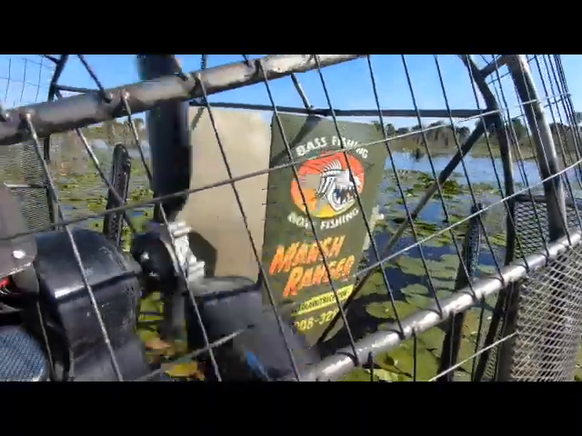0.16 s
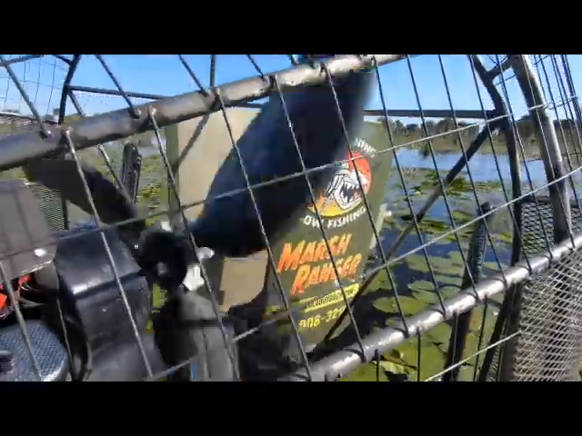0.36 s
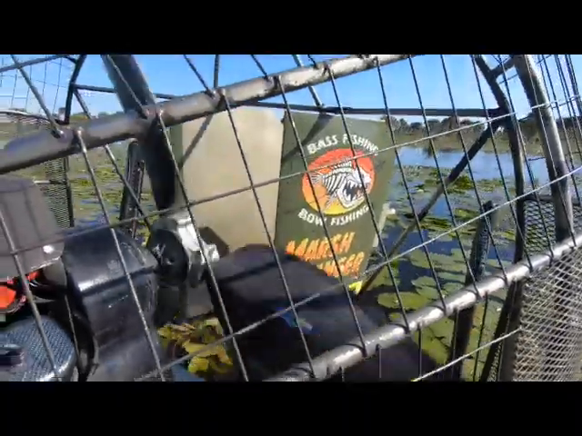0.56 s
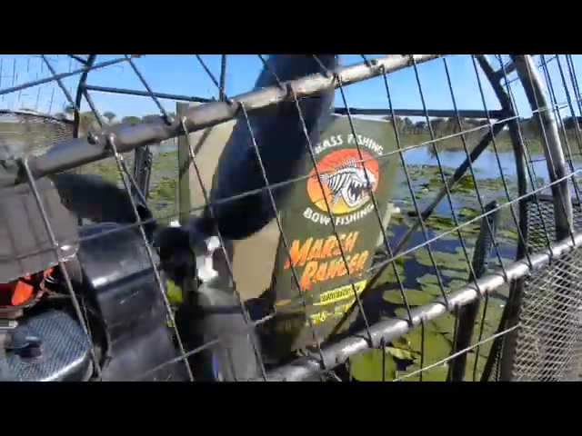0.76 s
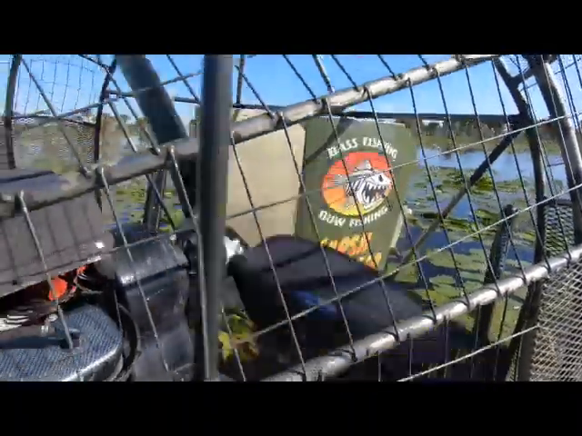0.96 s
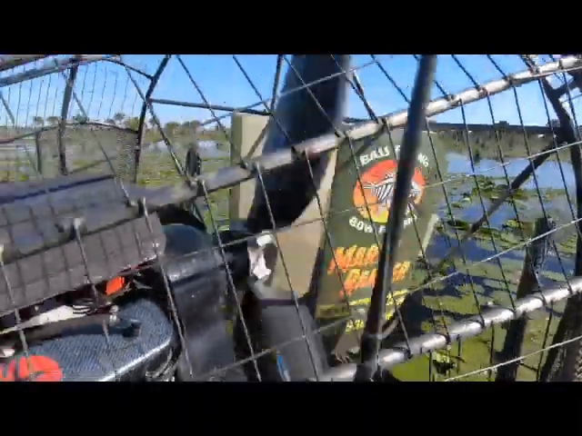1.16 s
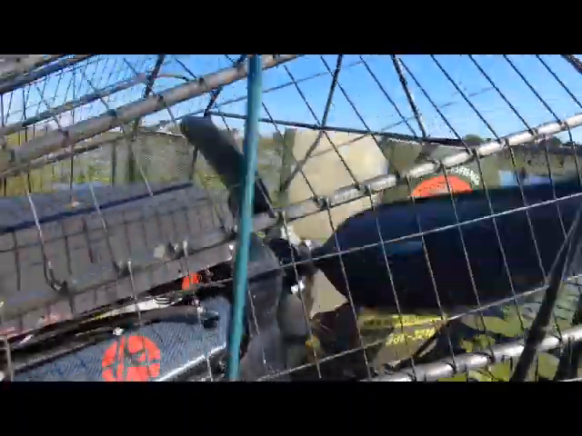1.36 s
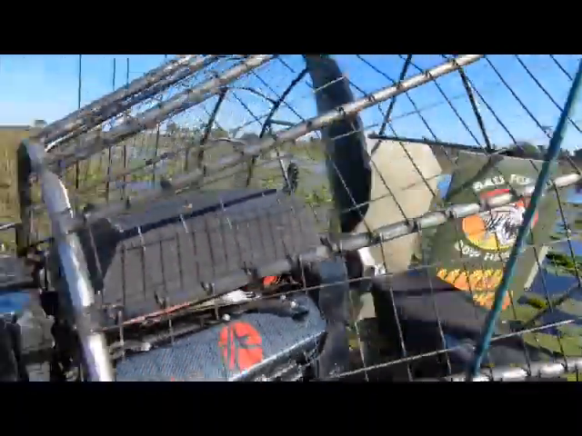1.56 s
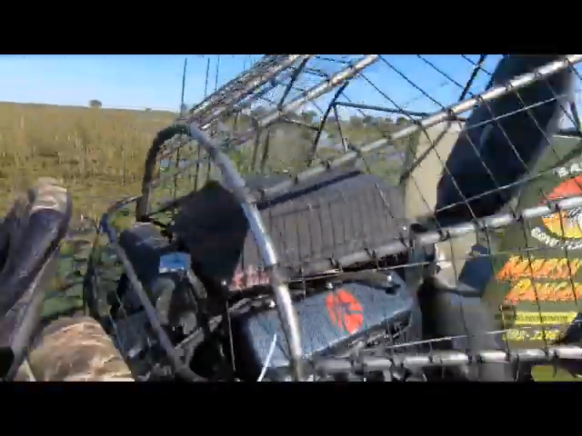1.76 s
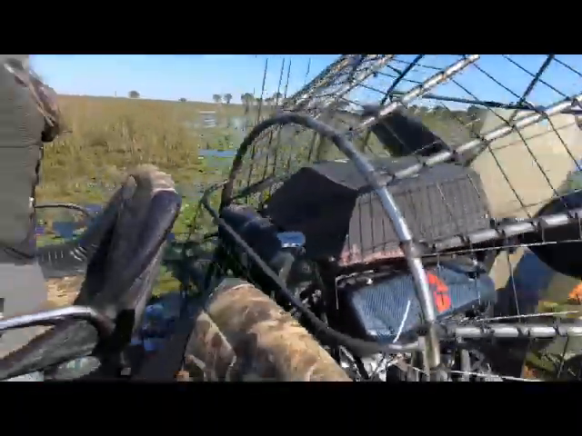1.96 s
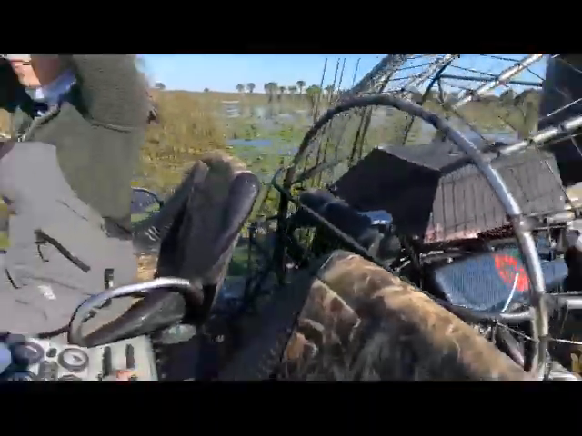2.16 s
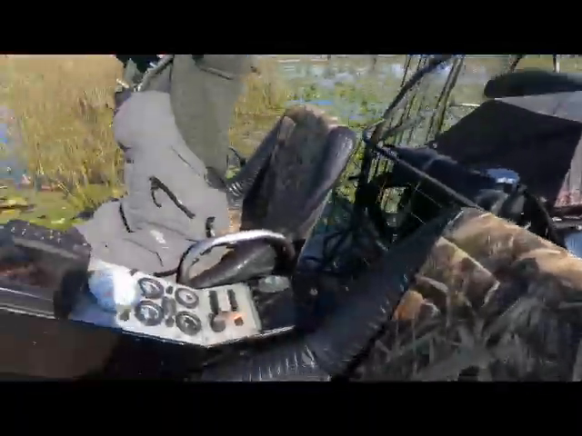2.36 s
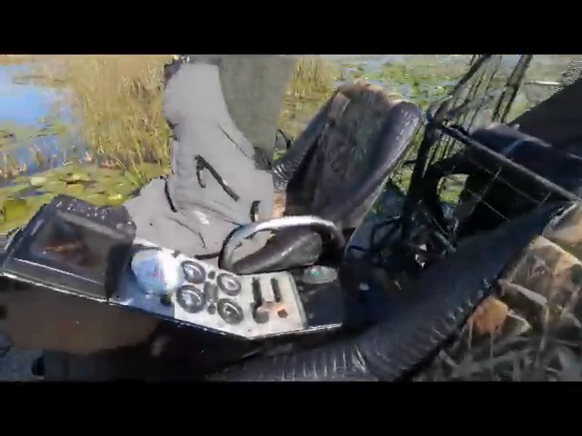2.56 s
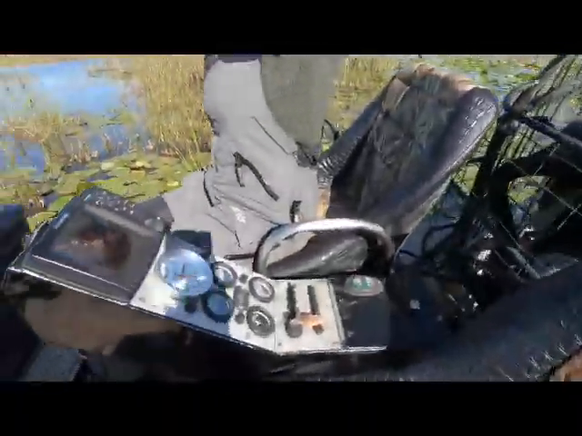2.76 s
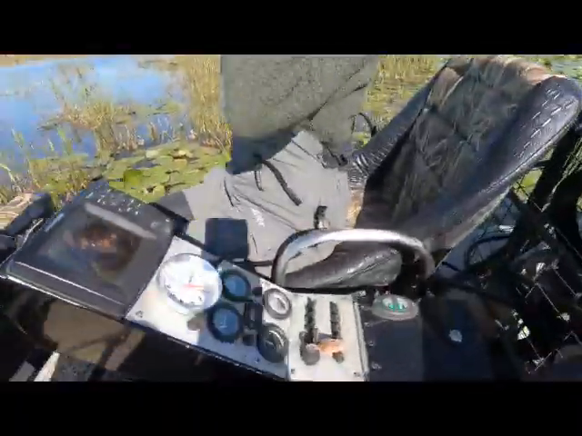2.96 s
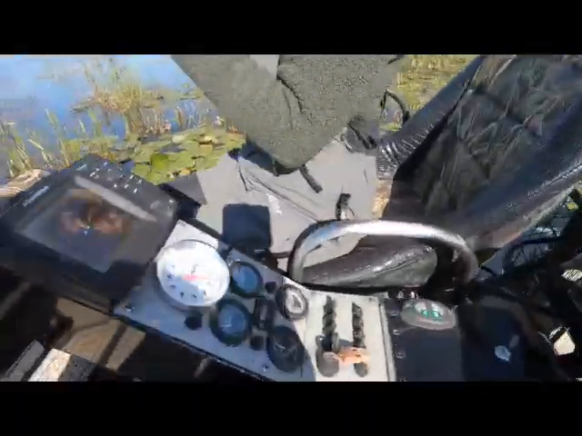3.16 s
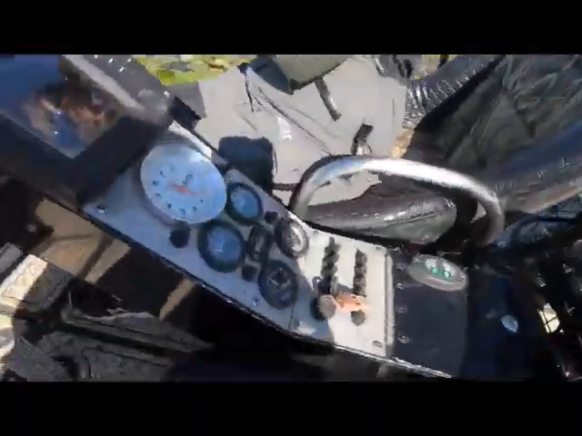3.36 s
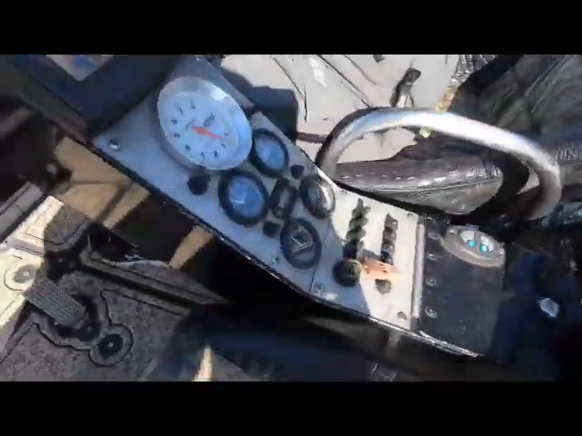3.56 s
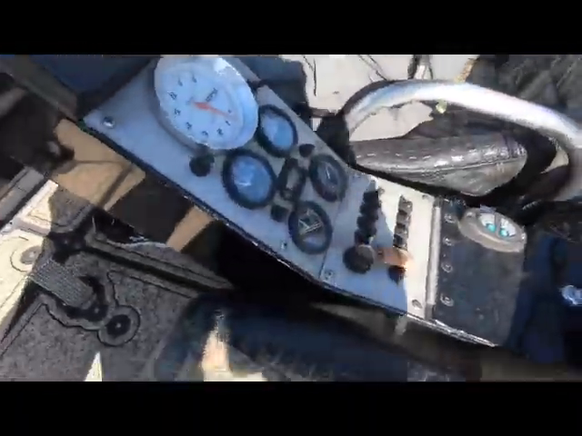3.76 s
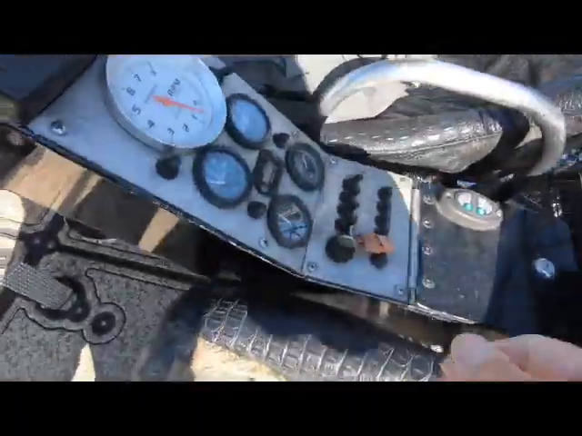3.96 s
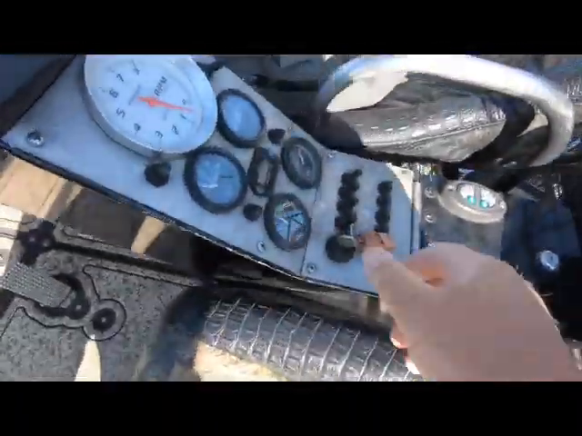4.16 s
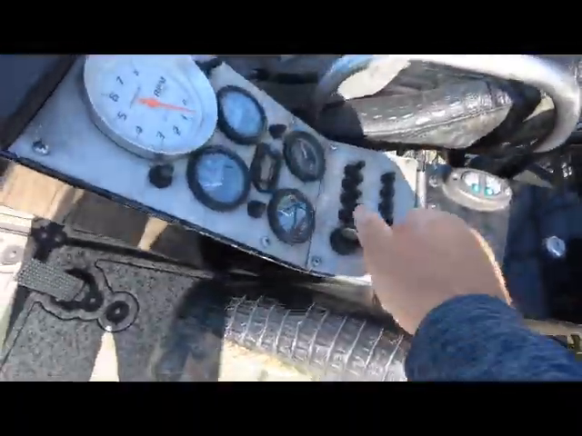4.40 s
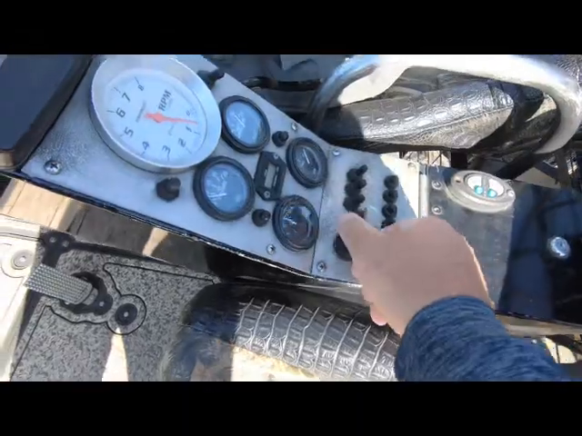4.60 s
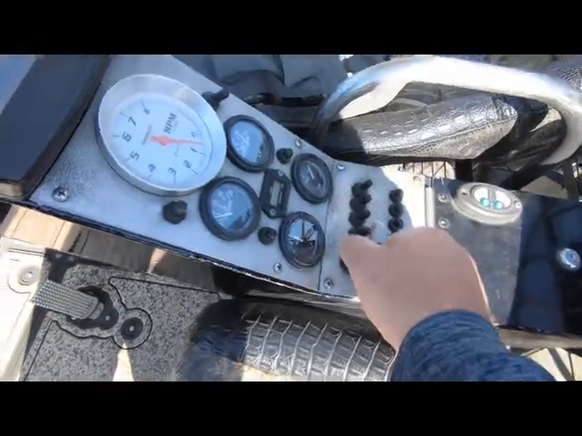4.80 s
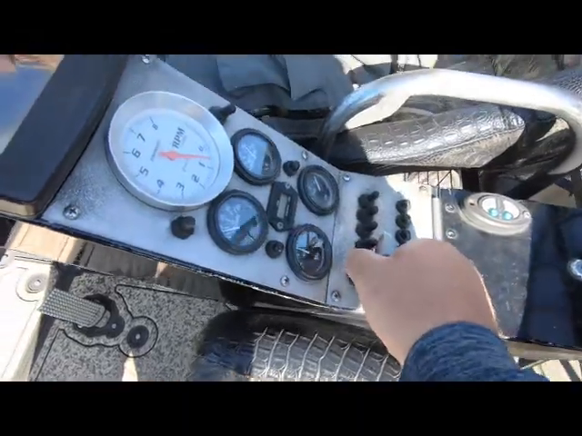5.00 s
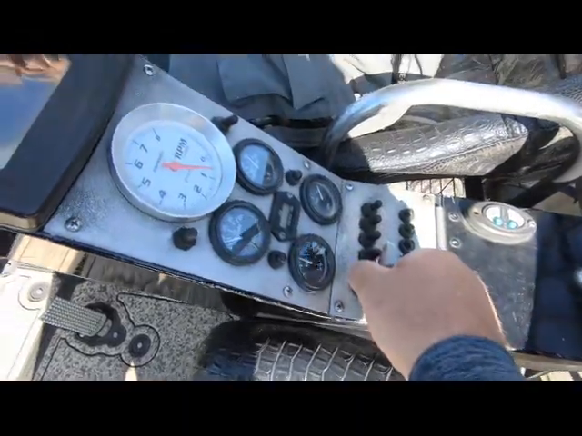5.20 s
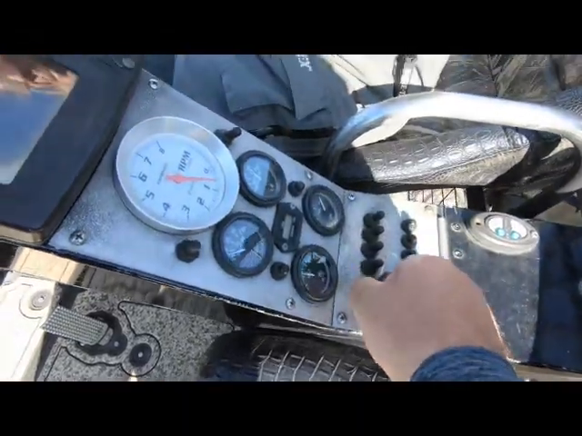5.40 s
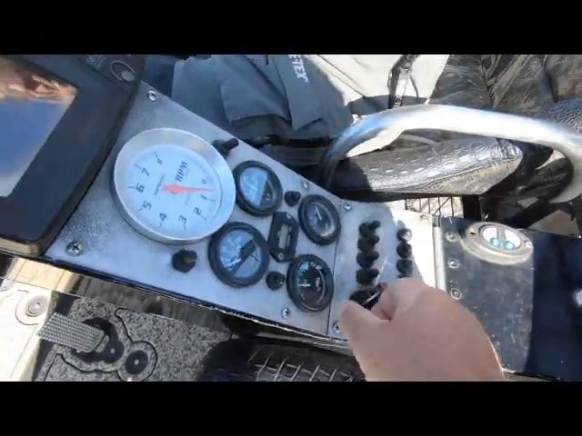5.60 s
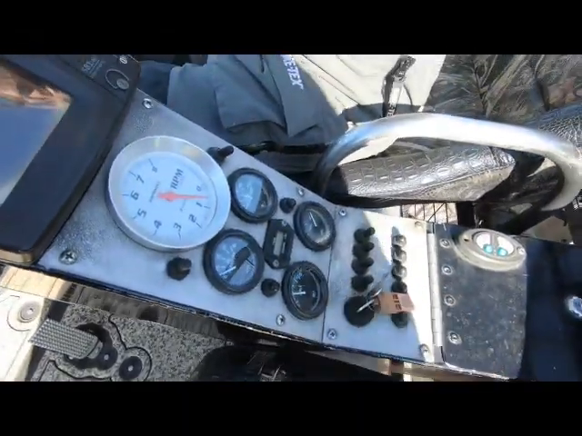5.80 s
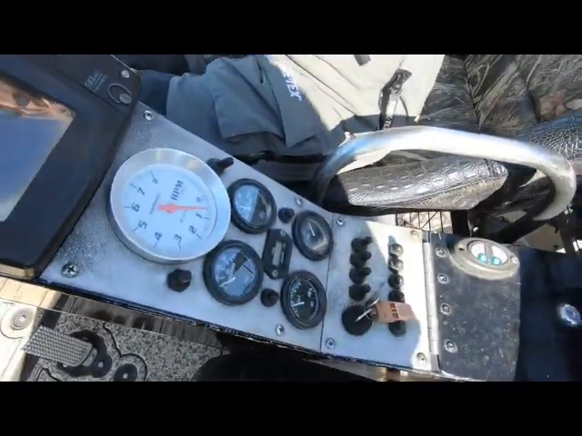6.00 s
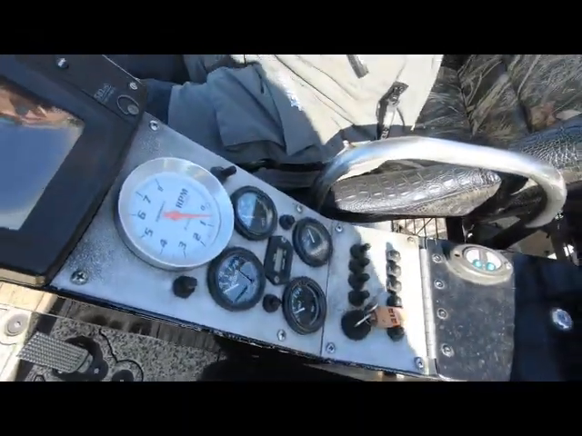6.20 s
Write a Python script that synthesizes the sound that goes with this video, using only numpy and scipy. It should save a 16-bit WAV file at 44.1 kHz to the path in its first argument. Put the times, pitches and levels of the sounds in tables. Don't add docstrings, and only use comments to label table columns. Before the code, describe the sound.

Outdoors on an open marsh, a large V8 with open pipes idles close to the microphone. Deep, uneven thumps pulse quickly, swelling as propeller blades pass, with metallic growl, thin gas hiss and small breathy spits. As the handheld microphone turns away, growl dulls while the bass stays. Near the end the engine is cut, drops, surges weakly and sinks into soft pumped air.

```python
import sys
import numpy as np
from scipy import signal
from scipy.fft import rfft, irfft, next_fast_len
from scipy.io import wavfile
from scipy.ndimage import uniform_filter1d

SR = 44100
rng = np.random.default_rng(int(sys.argv[2]) if len(sys.argv) > 2 else 0)


def voltage_ratio(decibels):
    exponent = np.asarray(decibels, float) / 20
    return 10 ** exponent


def unload_wav(signal):
    wavfile.write(
        sys.argv[1],
        SR,
        np.round(np.clip(np.atleast_2d(signal).T, -1, 1) * 32767).astype(np.int16),
    )


N = 275426
TIME = np.arange(N) / SR

# start_s, firings_per_s
IDLE_SPEED = [(0, 37.08), (.98, 37.64), (1.6, 34.7), (2.3, 37.66), (2.65, 36.08), (2.9, 37.05),
              (3.45, 34.1), (4.15, 35.56), (4.6, 37.2), (4.95, 35.35), (5.55, 36.68), (6.25, 21)]
FIRING_BANK = np.array([1, -1, -1, 1, -1, 1, 1, -1])
# start_s, near_bank_lead_firings, near_bank_louder_db, body_shade_db
CAMERA_PATH = [
    (0, .14, 2.5, -0.5),
    (1.05, .14, 2, 0),
    (1.7, .14, 4, -2.5),
    (2.3, .095, 1.3, -6),
    (2.7, .06, .8, -7.5),
    (3.8, .035, .9, -10.5),
    (4.3, .035, 1, -6.5),
    (5.3, .03, 1, -4.5),
    (6.25, .06, 2, -4),
]
# start_s, level_db
EFFORT_LEFT = [
    (5.39, 0),
    (5.47, -2.5),
    (5.6, -7),
    (5.72, -3.5),
    (5.82, -11),
    (5.97, -8),
    (6.06, -12.5),
    (6.12, -17.5),
    (6.25, -17.5),
]
# pitch_hz, t60_s, level_db
DEEP_MODES = [(71, .07, 0), (52, .08, -9), (100, .08, -9)]
BARK_MODES = [(123.1, 0.07, -3), (156.1, 0.085, -3), (217.4, 0.082, -10.5)]
# pitch_hz, density_db_per_hz
RUMBLE_COLOUR = [(22, -27.5), (30, -14.5), (40, -1), (60, -6.5), (76, -4), (90, -6), (125, -2), (160, -7),
                 (180, -23), (225, -14.5), (260, -31.5), (300, -25)]
# pitch_hz, width_hz, level_re_thump_db
COAST_MODES = [(55.1, 19.6, 3), (89.9, 11, -8), (152.8, 24.5, -4.5), (194.8, 21, -10.5)]
# pitch_hz, density_db_per_hz
GROWL_COLOUR = [(130, -20), (220, 0), (264, -5.5), (339, -5.5), (393, -3), (431, -10), (484, -9),
                (777, -17), (880, -15.5), (1280, -24.5), (1600, -29.5), (2080, -50.5), (3520, -120)]
# pitch_hz, width_hz, level_re_growl_db, coasting_gain_db
HUM_PANELS = [(381.6, 39, -12.5, -6.5), (432.6, 6.4, -14, 6), (455, 63, -15, -5), (677, 3.3, -25, 15.5),
              (917, 2.6, -31.5, 16)]
# pitch_hz, density_db_per_hz
HISS_COLOUR = [(650, -24), (1100, 3), (1330, -13), (1630, 0.5), (2060, 3), (2270, -2.5), (3240, -7),
               (4450, -2.5), (5340, -1), (6170, -15), (8560, -16), (9070, -19.5), (9800, -55), (11000, -49),
               (14300, -73), (22000, -120)]
FIZZ_COLOUR = [(6180, -38), (10500, -30), (11300, -22.5), (12100, 3), (12600, -3), (14500, -6), (15200, -3)]
# start_s, peak_db, whistle_hz, broad_hiss_re_peak_db
LATE_BURNS = [(0.0044, -36, 7100, -1), (0.165, -43, 7060, 4), (0.4642, -41.5, 6800, 3.5),
              (0.599, -33, 7670, 0), (0.7295, -44.5, 6900, 3.5), (1.026, -45.5, 7280, 8.5),
              (1.074, -47.5, 8100, 6), (1.382, -38.5, 6500, 0), (1.52, -32.5, 7150, -7.5),
              (1.914, -46.5, 6900, 6), (1.9717, -38, 7160, 0), (2.052, -40.5, 6800, -1),
              (2.212, -50.5, 6700, 9), (2.347, -48, 7040, 8.5), (2.654, -52, 7030, 5),
              (2.7926, -49.5, 7500, 5.5), (2.8424, -48, 6400, 3), (3.2276, -48.5, 6940, 7.5),
              (3.5466, -44, 6910, 1.5), (3.6938, -36, 6920, -7.5), (3.8885, -50, 6200, 6.5),
              (4.008, -41, 6660, -6), (4.0597, -42.5, 6900, -11), (4.1703, -53, 6850, 8.5),
              (4.591, -51.5, 7700, 8.5), (4.81, -48, 6780, 2.5), (5.0887, -48, 7040, 5),
              (5.359, -46, 7500, 6.5), (5.664, -52, 7960, 6.5), (5.93, -60, 6900, 8)]
# pitch_hz, density_db_per_hz
SPIT_COLOUR = [(700, 6), (1500, 4), (3000, -2.5), (5000, 2.5), (8000, -10.5), (9500, -14), (10500, -21.5)]


def unit(x):
    return x / np.sqrt(np.mean(x ** 2))


def noise():
    return rng.standard_normal(N)


def walk(rate):
    hold = int(SR / rate)
    steps = np.repeat(rng.standard_normal(N // hold + 2), hold)
    return unit(uniform_filter1d(uniform_filter1d(steps, hold), hold)[:N])


def curves(table):
    start_s, *columns = np.transpose(table)
    return [np.interp(TIME, start_s, column) for column in columns]


def colour(x, points, slope_db=-30):
    hz, db = np.transpose(points)
    size = next_fast_len(2 * len(x), True)
    octave = np.log2(np.maximum(np.arange(size // 2 + 1) * SR / size, 1))
    outside = np.maximum(np.log2(hz[0]) - octave, 0) + np.maximum(octave - np.log2(hz[-1]), 0)
    curve_db = np.interp(octave, np.log2(hz), db) + slope_db * outside
    cepstrum = irfft(curve_db * np.log(10) / 20, size)
    cepstrum[1:size // 2] *= 2
    cepstrum[size // 2 + 1:] = 0
    return irfft(rfft(x, size) * np.exp(rfft(cepstrum)), size)[:len(x)]


def ring(x, hz, width):
    return signal.lfilter(*signal.iirpeak(hz, hz / width, fs=SR), x)


def clicks(turns, when, size):
    at = np.interp(when, turns, np.arange(N)).astype(int)
    return np.bincount(at, size * (at > 0) * (at < N - 1), N)


def puff(pulses, rise_s, fall_s):
    t = np.arange(SR // 4) / SR
    return signal.fftconvolve(pulses, np.exp(-t / fall_s) - np.exp(-t / rise_s))[:N]


def swing(pulses, modes):
    t = np.arange(SR // 4) / SR
    kernel = sum(-voltage_ratio(db) * np.sin(2 * np.pi * hz * t) * np.exp(-np.log(1000) * t / t60) for hz, t60, db in modes)
    onset = 1 - np.exp(-t / .006)
    return unit(signal.fftconvolve(pulses, kernel * onset)[:N])


def firings(turns, lead, near_db):
    n, chance = np.arange(-4, 226), rng.standard_normal((230, 2))
    blades_per_firing = 3 / 16
    blade = np.cos(2 * np.pi * (blades_per_firing * n - .72))
    bank = FIRING_BANK[n % 8]
    when = n + .48 - bank * np.interp(n, turns, lead) + .07 * blade + .03 * chance[:, 0]
    db = bank * np.interp(n, turns, near_db) + 6 * blade + 1.1 * chance[:, 1]
    return clicks(turns, when, voltage_ratio(db))


def band(x, low_hz, high_hz):
    return signal.sosfiltfilt(signal.butter(3, [low_hz, high_hz], "band", fs=SR, output="sos"), x)


def exhaust(turns, pulses, burn, thump_db, bark_db):
    n, chance = np.arange(-4, 226), rng.standard_normal((230, 3))
    stray_size = voltage_ratio(1.73 * chance[:, 1]) * np.sign(chance[:, 2])
    stray = unit(clicks(turns, n + 0.3115 * chance[:, 0], stray_size))
    beat = voltage_ratio(-6.5) * np.cos(2 * np.pi * turns)
    deep = swing(unit(pulses) + voltage_ratio(-18) * stray, DEEP_MODES) + beat
    bark = -swing(unit(pulses) + voltage_ratio(-1) * stray, BARK_MODES)
    rumble = unit(colour(noise(), RUMBLE_COLOUR))
    fired = deep + voltage_ratio(-7) * bark + voltage_ratio(-16) * rumble
    pumped = sum(voltage_ratio(db) * unit(ring(ring(noise(), hz, width), hz, 2 * width)) for hz, width, db in COAST_MODES)
    whole = burn * unit(fired) + np.sqrt(1 - burn ** 2) * unit(pumped)
    low, high = band(whole, 29, 110), band(whole, 110, 250)
    return voltage_ratio(thump_db) * unit(low) + voltage_ratio(bark_db - 1.4 * (1 - burn)) * unit(high)


def block(gate, coasting):
    shake = noise() * (1 + .3 * gate) * voltage_ratio(.8 * walk(25))
    hum = 0
    for hz, width, db, gain_db in HUM_PANELS:
        level_db = db + gain_db * coasting + 1.7 * walk(3.3)
        hum = hum + voltage_ratio(level_db) * unit(ring(shake, hz, width))
    return unit(voltage_ratio(-3 * coasting) * unit(colour(shake, GROWL_COLOUR)) + hum)


def gas(gate, points, depth, flicker_db):
    return unit(colour(noise() * (1 + depth * gate) * voltage_ratio(flicker_db * walk(30)), points))


def spits(shade_db):
    out, t = np.zeros(N + SR), np.arange(SR // 5) / SR
    air = unit(colour(noise(), SPIT_COLOUR)) + voltage_ratio(-9) * unit(colour(noise(), FIZZ_COLOUR))
    jet = noise()
    for start_s, peak_db, whistle_hz, broad_db in LATE_BURNS:
        i = max(int((start_s - .012) * SR), 0)
        span = slice(i, i + len(t))
        t60 = max(.056 - .004 * shade_db[i], .02)
        shape = (1 - np.exp(-t / .016)) ** 3 * np.exp(-np.log(1000) * t / t60)
        shape = shape / shape.max()
        whistle = unit(ring(ring(jet[span], whistle_hz, 650.0), whistle_hz, 650.0))
        hiss = voltage_ratio(broad_db + 7.3) * shape ** .6 * air[span]
        out[span] += voltage_ratio(peak_db - 10.0) * shape * (whistle + hiss)
    return out[:N]


def scene():
    lead, near_db, shade_db = curves(CAMERA_PATH)
    effort_db, = curves(EFFORT_LEFT)
    thump_db = -17 + .08 * shade_db + 1.36 * effort_db
    bark_db = -24 + .12 * shade_db + .72 * effort_db
    growl_db = -33.5 + shade_db + 0.57 * effort_db
    hiss_db = -48.4 + .08 * shade_db + .66 * effort_db

    burn_ends_s, burn_fade_s = 6.25, 0.81
    burn = 0.883 * np.clip((burn_ends_s - TIME) / burn_fade_s, 0, 1)
    turns = -2.99 + np.cumsum(curves(IDLE_SPEED)[0]) / SR
    pulses = firings(turns, lead, near_db)
    thump = exhaust(turns, pulses, burn, thump_db, bark_db)
    gate = np.clip(burn + .3, 0, 1) * unit(puff(pulses, rise_s=.004, fall_s=.008))
    hiss = gas(gate, HISS_COLOUR, depth=0.67, flicker_db=0.64)
    fizz = gas(gate, FIZZ_COLOUR, depth=1.2, flicker_db=-2.0)
    hiss = hiss + voltage_ratio(-16.0 - .3 * shade_db) * fizz
    growl = block(gate, 1 - burn)
    engine = thump + voltage_ratio(growl_db + 2.5) * growl + voltage_ratio(hiss_db - 0.7) * hiss
    return (engine + spits(shade_db))[None]


def low_pass(x):
    return signal.sosfilt(signal.butter(12, 15360, fs=SR, output="sos"), x)


def record(dry):
    top = signal.sosfiltfilt(signal.butter(6, 11200, "high", fs=SR, output="sos"), dry)
    starve_start_s, starve_end_s, edge_s = 3.4, 4.34, .08
    inside_s = np.minimum(TIME - starve_start_s, starve_end_s - TIME)
    starved = np.clip(inside_s / edge_s + .5, 0, 1)
    dulled = dry + (voltage_ratio(-6.5 - 28 * starved) - 1) * top
    rounded = np.tanh(2.112 * dulled) / 1.955 - .0017
    return low_pass(rounded)


dry = scene()
out = record(dry)
unload_wav(out)
```